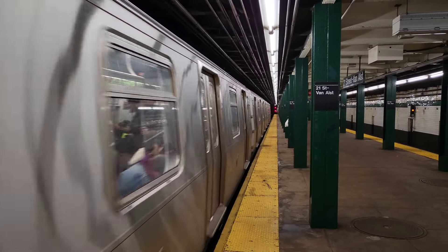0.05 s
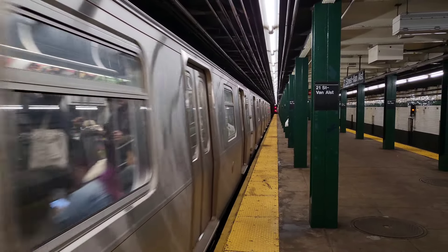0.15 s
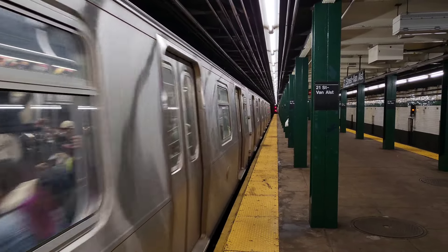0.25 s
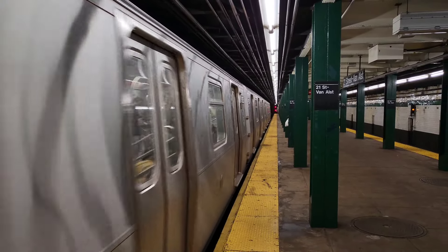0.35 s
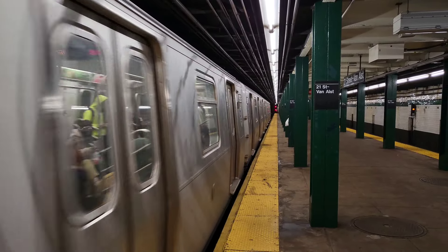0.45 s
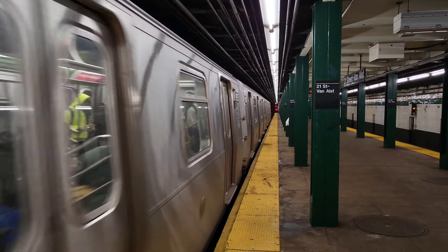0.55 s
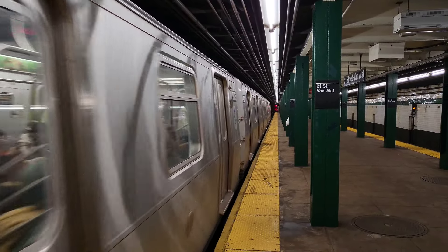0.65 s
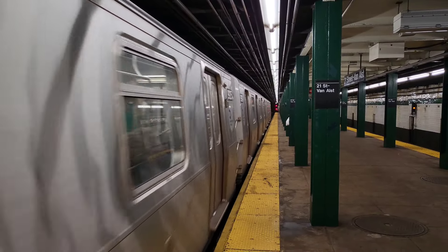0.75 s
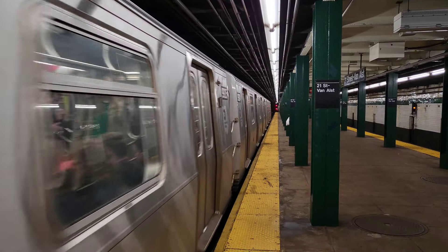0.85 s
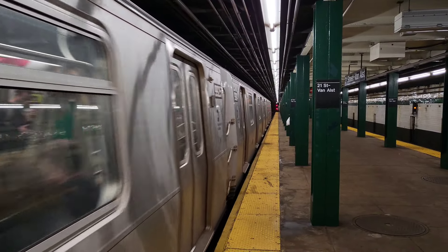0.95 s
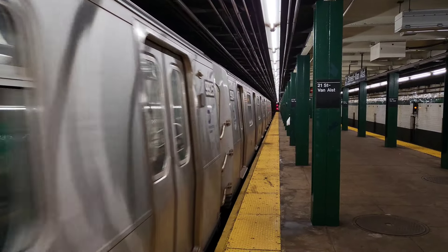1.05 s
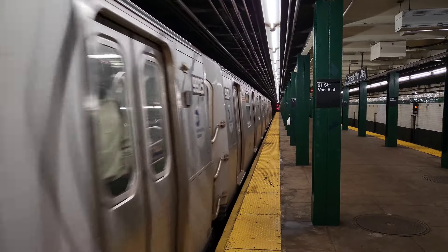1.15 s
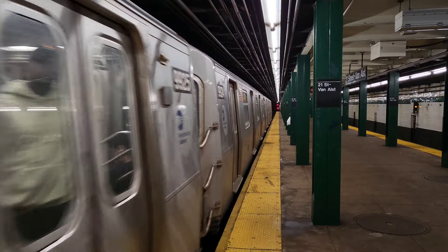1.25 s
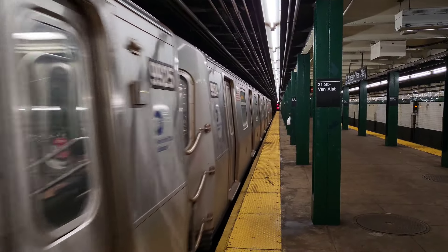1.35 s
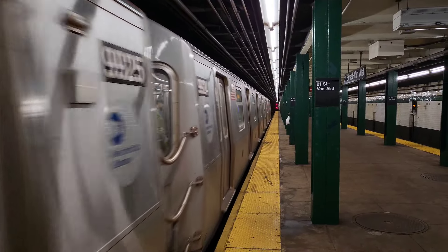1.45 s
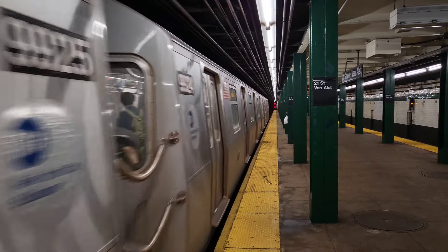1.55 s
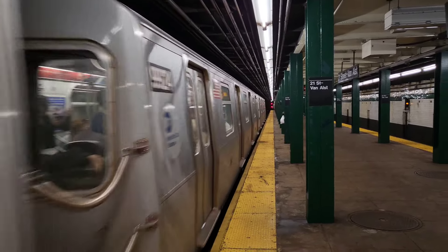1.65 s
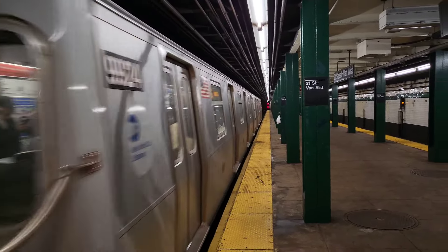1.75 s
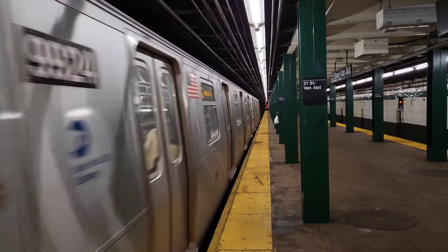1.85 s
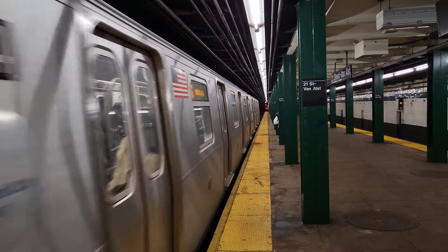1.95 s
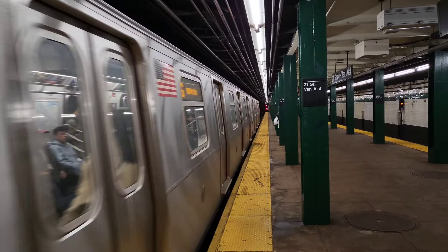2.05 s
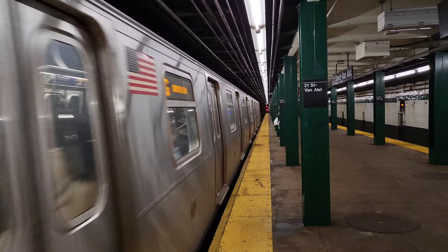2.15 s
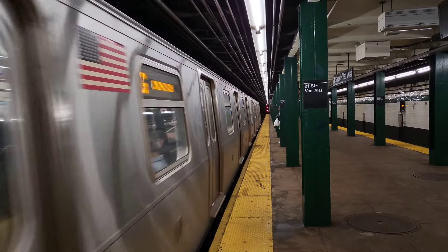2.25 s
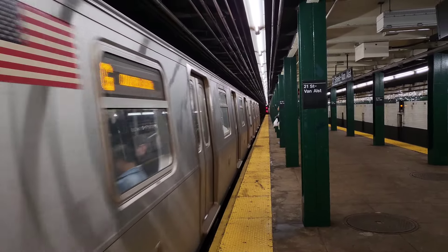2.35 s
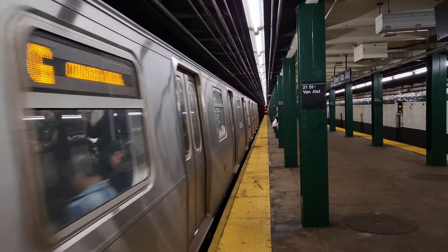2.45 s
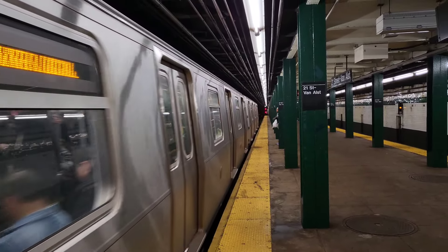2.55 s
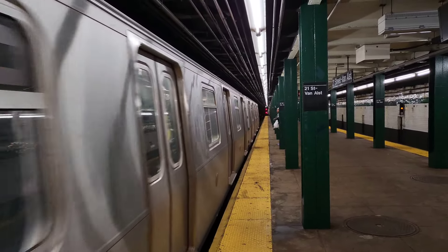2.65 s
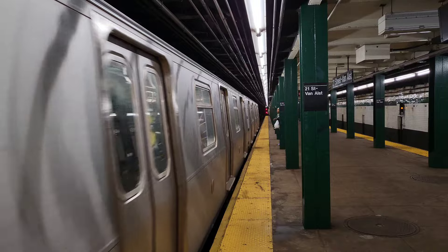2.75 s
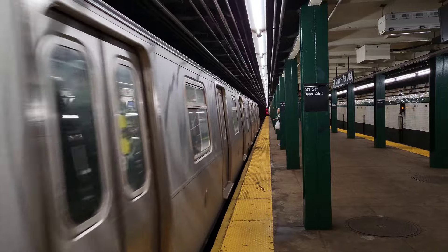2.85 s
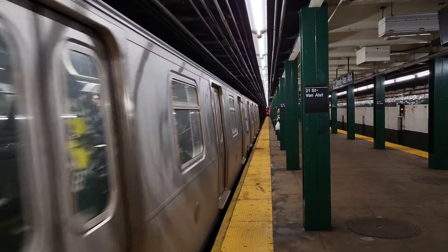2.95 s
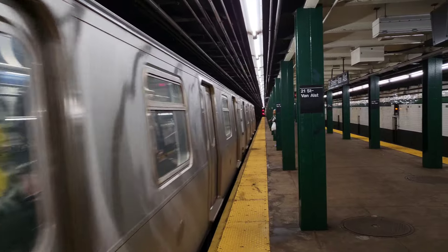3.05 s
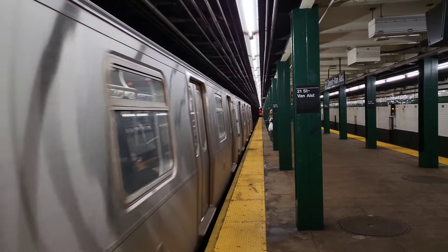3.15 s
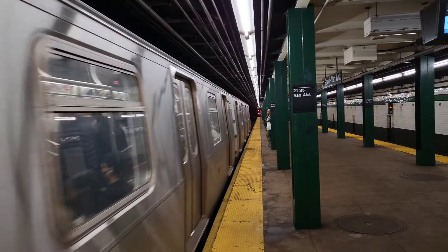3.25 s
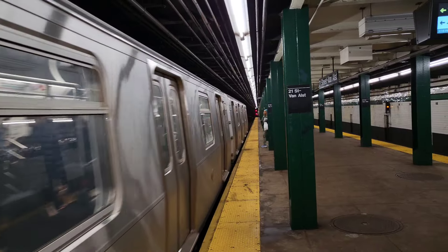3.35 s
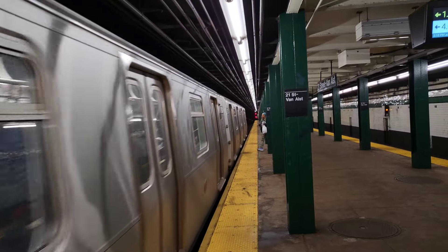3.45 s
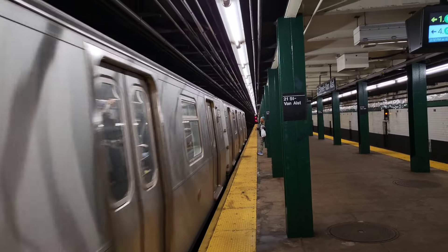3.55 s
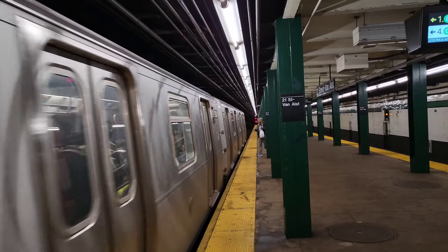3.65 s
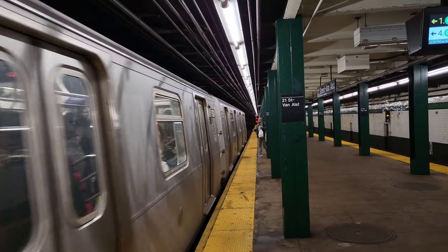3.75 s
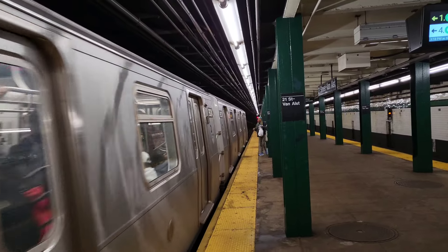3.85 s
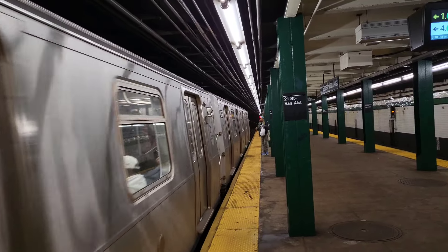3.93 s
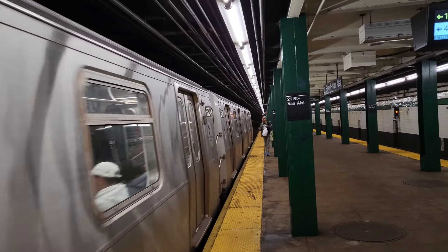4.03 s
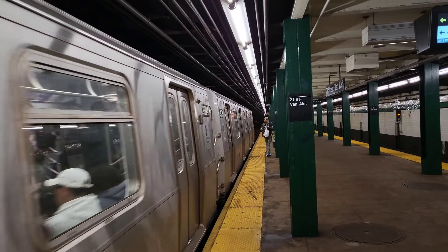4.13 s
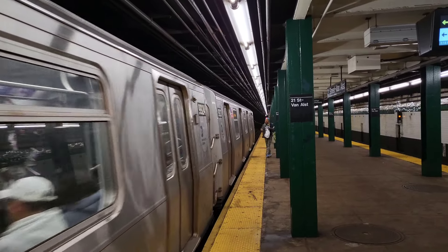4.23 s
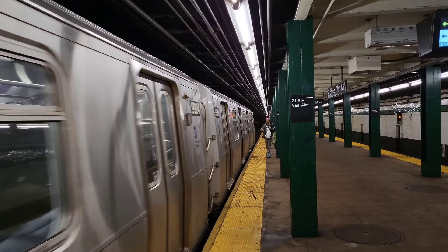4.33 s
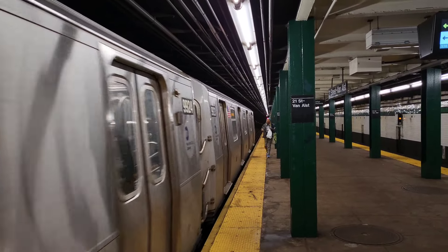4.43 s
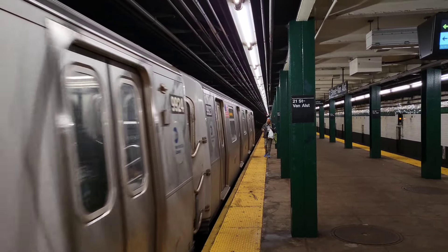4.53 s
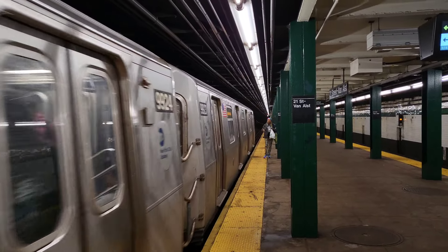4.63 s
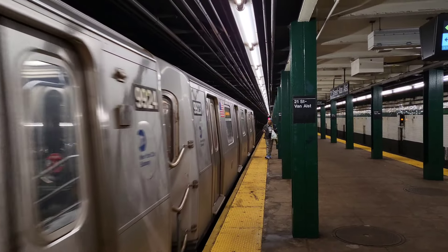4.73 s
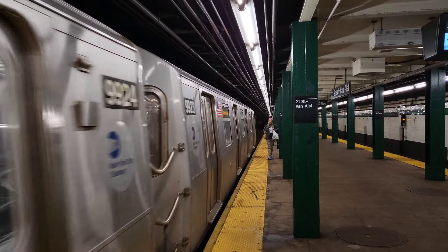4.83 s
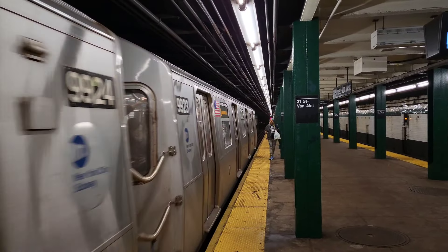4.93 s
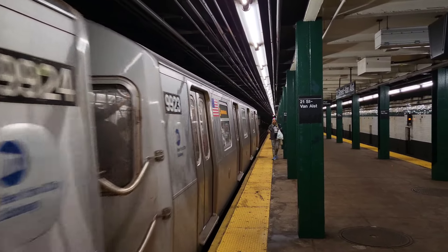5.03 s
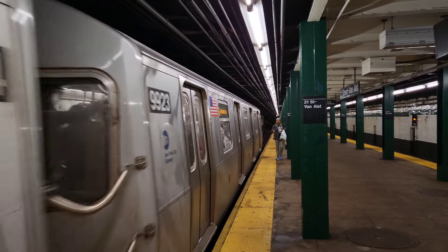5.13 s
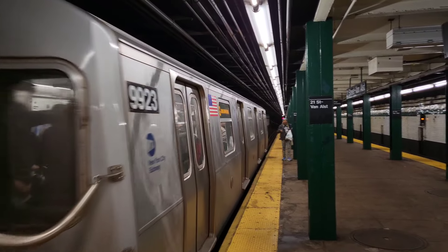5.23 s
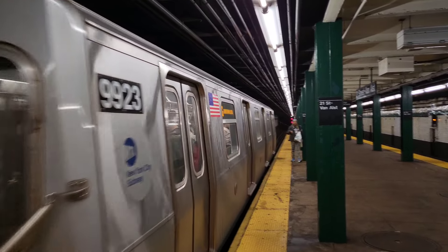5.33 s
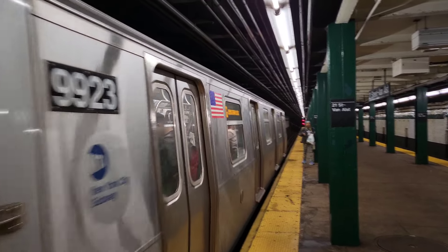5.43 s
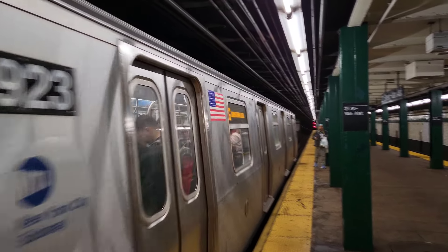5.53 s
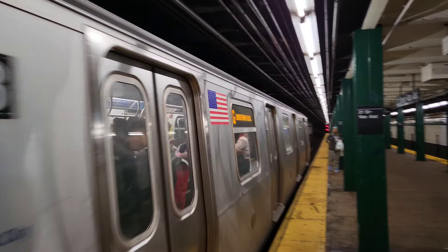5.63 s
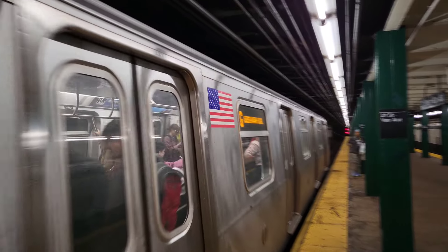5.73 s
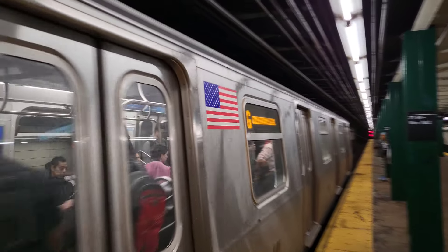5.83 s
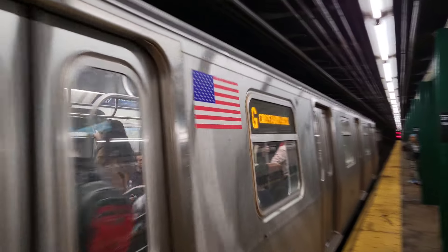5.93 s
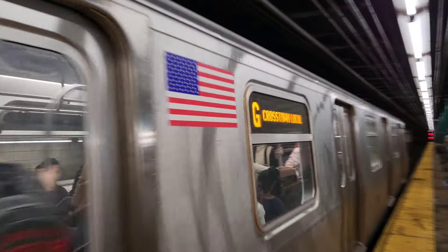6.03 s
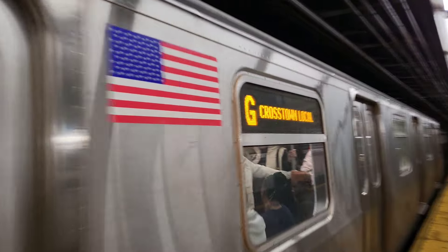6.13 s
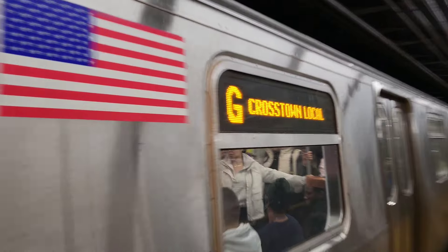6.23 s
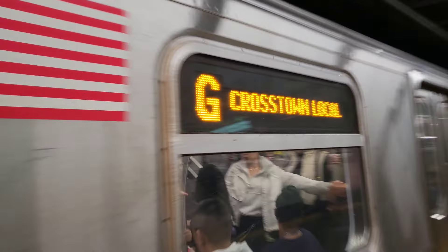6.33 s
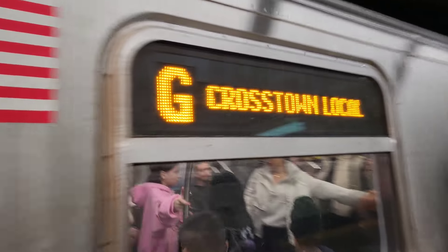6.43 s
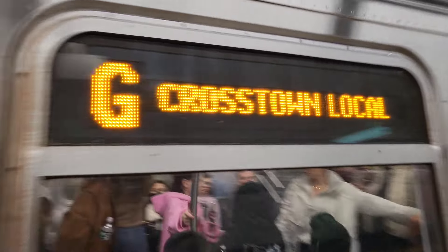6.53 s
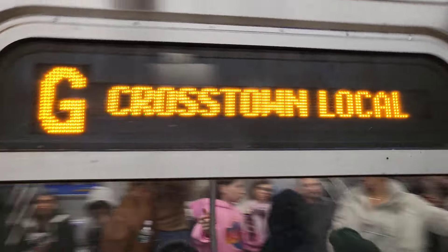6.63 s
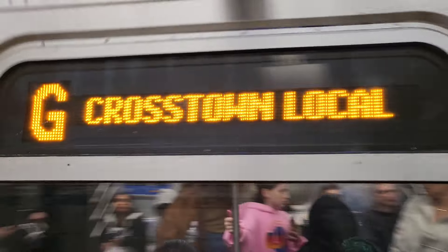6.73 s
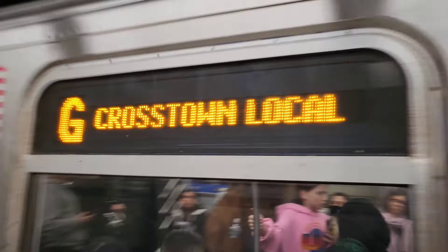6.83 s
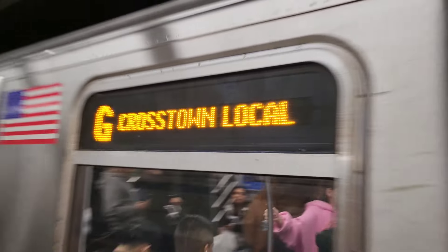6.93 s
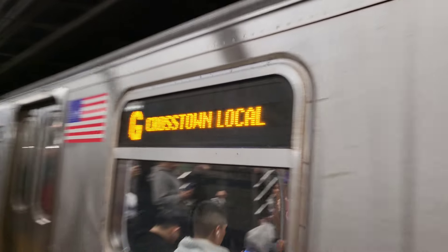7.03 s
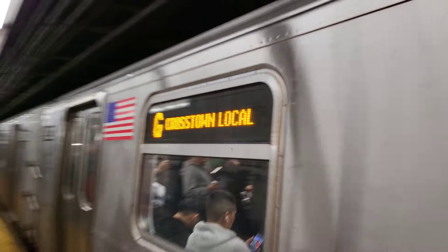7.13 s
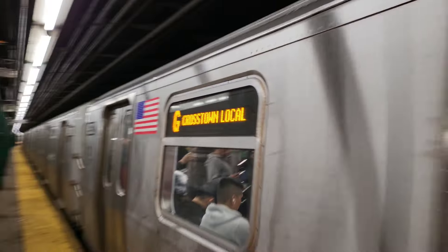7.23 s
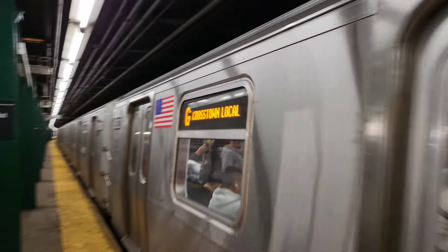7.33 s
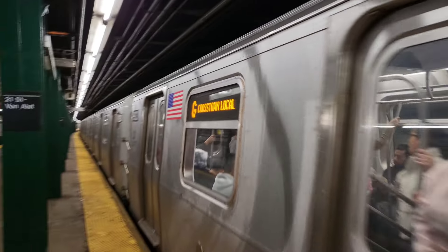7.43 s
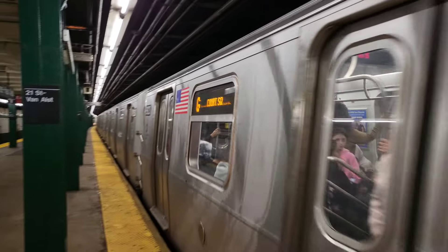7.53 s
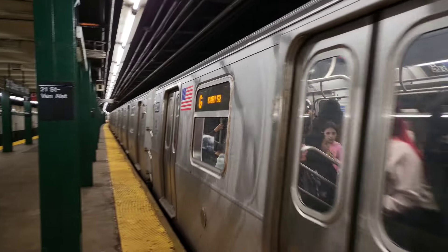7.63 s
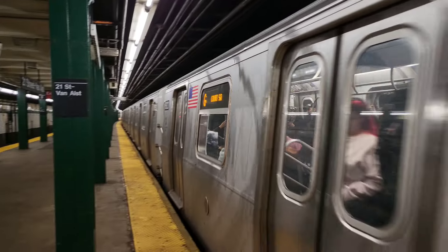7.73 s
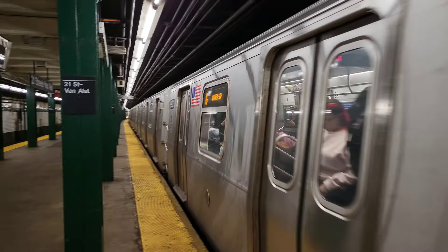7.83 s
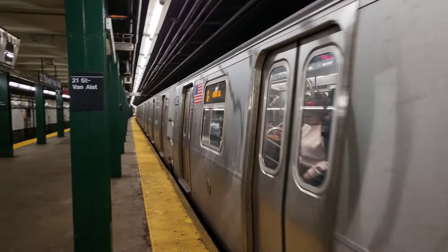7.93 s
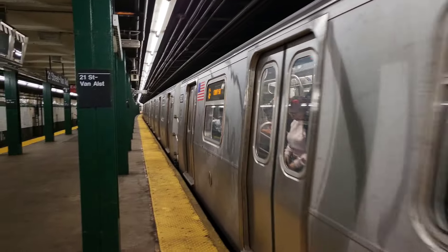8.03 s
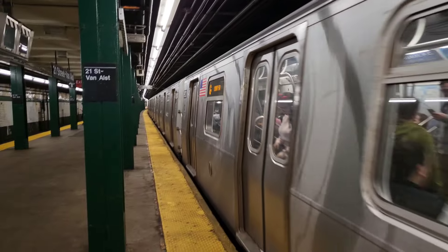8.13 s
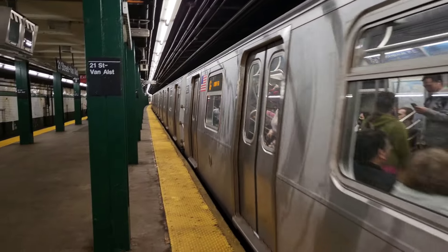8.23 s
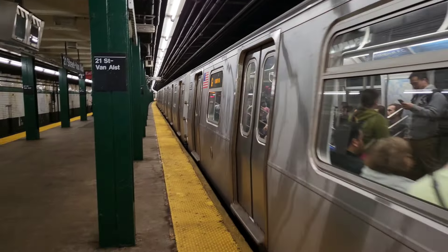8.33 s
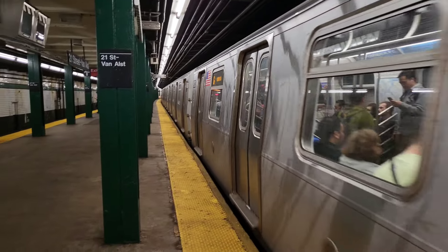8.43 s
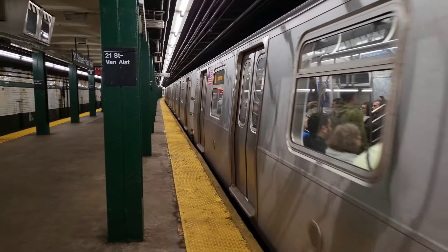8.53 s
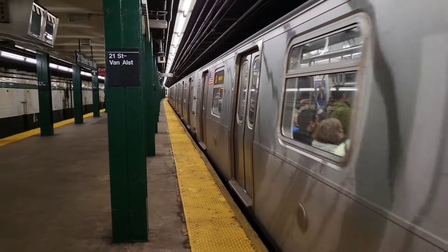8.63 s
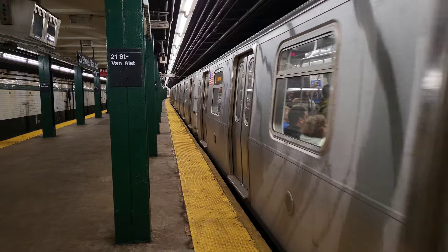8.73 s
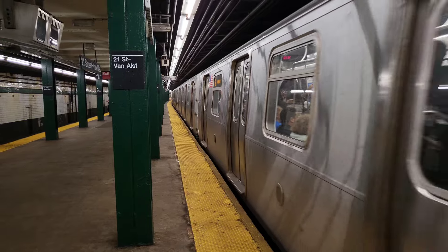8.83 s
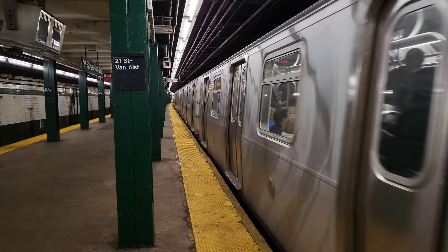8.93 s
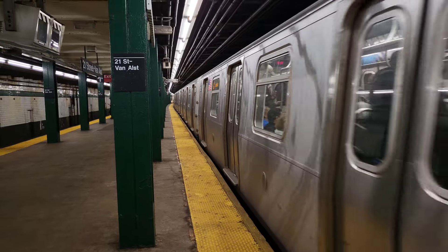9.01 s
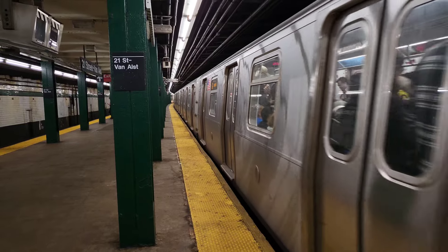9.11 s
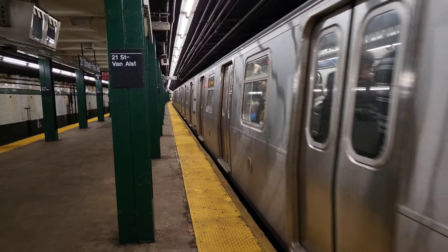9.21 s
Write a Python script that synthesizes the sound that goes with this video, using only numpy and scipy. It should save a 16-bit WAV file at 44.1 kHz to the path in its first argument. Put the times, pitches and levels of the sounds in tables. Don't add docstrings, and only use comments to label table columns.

```python
import sys
import numpy as np
from scipy import signal
from scipy.fft import rfft, irfft, next_fast_len
from scipy.io import wavfile

SR = 44100
rng = np.random.default_rng(int(sys.argv[2]) if len(sys.argv) > 2 else 0)


def invert_db(x):
    u = np.asarray(x, float) / 20
    return 10 ** u


def master_out(mix):
    frames = np.transpose(np.atleast_2d(mix))
    ceiling = np.clip(frames, -1, 1)
    pcm = np.round(ceiling * 32767).astype(np.int16)
    wavfile.write(sys.argv[1], SR, pcm)


N = 408807
STEP = 16


def rms_one(x):
    return x / np.sqrt(np.mean(np.abs(x) ** 2) + 1e-20)


def in_time(rows, t):
    s, *columns = np.transpose(rows)
    return np.array([np.interp(t, s, column) for column in columns])


def at_hz(points, hz):
    point_hz, value = np.transpose(points)
    return np.interp(np.log(hz), np.log(point_hz), value)


def bump(t, s, before_s, after_s):
    return np.exp(-((t - s) / np.where(t < s, before_s, after_s)) ** 2)


def slow_noise(hz, size):
    sos = signal.butter(2, np.clip(hz, .1, 600), fs=SR / STEP, output="sos")
    run_in = 1500
    return rms_one(signal.sosfilt(sos, rng.standard_normal(size + run_in))[run_in:])


def spread(width_hz, size):
    return slow_noise(width_hz / 2, size) + 1j * slow_noise(width_hz / 2, size)


def add(out, envelope, hz):
    slow = envelope.shape[1]
    bins = round(hz * slow * STEP / SR) + np.fft.fftfreq(slow, 1 / slow).astype(int)
    out[:, bins[bins > 0]] += np.fft.fft(envelope)[:, bins > 0] * STEP / 2


# time_s, rise_db, approach_s,
# leave_s
BOGIES = [
    (-0.05, 0, .3, .45),
    (1.92, 4, 0.17, 0.54),
    (2.72, 2, .08, 0.073),
    (4.65, 2.5, 0.24, 0.2),
    (5.5, 5.5, 0.46, 0.5),
    (6.45, 2, .1, .1),
    (9.1, 4.5, 0.19, 0.54),
]


def nearness(t):
    return sum(db * bump(t, s, approach_s, leave_s) for s, db, approach_s, leave_s in BOGIES)


# time_s, motor_current_hz
MOTOR = [
    (0, 66.32),
    (3, 57.93),
    (5.4, 47.62),
    (9.27, 32.2),
]


def motion(t, law):
    turn_s, turn_length_s = 5.87, 0.36
    halvings = np.log2(MOTOR[0][1] / in_time(MOTOR, t)[0])
    turned = np.clip((t - turn_s) / turn_length_s + .5, 0, 1)
    moves_db = np.array(law) @ [halvings, nearness(t), turned]
    return moves_db - moves_db.mean(1, keepdims=True)


# frequency_hz, likeness (-1 to 1)
LIKENESS = [(60, 0.91), (110, 0.99), (200, 0.94), (380, 0.8), (700, 0.38), (1290, -0.33), (2380, 0.027),
            (4400, 0.018), (8120, -0.033), (15000, -0.067)]


def two_ports(hz, mid, side):
    alike = np.clip(at_hz(LIKENESS, hz), -1, 1)
    return np.sqrt(1 + alike) * mid + np.sqrt(1 - alike) * side * [[1], [-1]]


def banded_noise(spectrum, centres_hz, moves_db, low_hz, high_hz, patchy_db, shared_db, order, size):
    slow = moves_db.shape[1]
    length = slow * STEP // size
    hz = np.maximum(np.arange(length // 2 + 1) * SR / size / length, 1)
    mid, side = rfft(rng.standard_normal((2, length))) * invert_db(at_hz(spectrum, hz))
    pair = two_ports(hz, mid, side)
    rank = np.argsort(centres_hz)
    together = slow_noise(8.6, slow)
    out = 0
    for centre in low_hz * 2 ** np.arange(0, np.log2(high_hz / low_hz), 1 / order):
        window = np.clip(1 - order * np.abs(np.log2(hz / centre)), 0, 1)
        shares = [np.interp(np.log(centre), np.log(np.sort(centres_hz)), rank == k) for k in range(len(rank))]
        gain_db = shares @ moves_db + shared_db * together + patchy_db * slow_noise(23.0, slow)
        gain = np.interp(np.arange(length) * size / STEP, np.arange(slow), invert_db(gain_db))
        out = out + gain * irfft(pair * window, length)
    return rms_one(irfft(rfft(out), slow * STEP)[:, :N])


ROLL_HZ = [180, 55, 420, 950]
# frequency_hz, level_db (per Hz)
RUMBLE = [(12, -45), (25, -20), (40, -7.5), (58, -5.5), (100, -12), (125, 2), (190, -0.5), (265, -4.5),
          (380, -5), (530, -10), (800, -16), (1100, -21.5), (1900, -27.5), (2700, -32)]
# level_db per halving of speed, share of bogie nearness, level_db after the turn
ROLL_LAW = [
    (-1.5, 0.04, -2.5),
    (-0.5, .05, .5),
    (-10, 0.14, 0),
    (-7, 0.35, 0),
]
# time_s, swell_db, centre_hz, reach_octaves
JOLTS = [(0.33, 3.5, 200, 1), (0.74, 4, 250, 1.5), (0.86, 3.5, 300, 1.2), (1.18, 5.5, 950, 1),
         (1.26, 7, 180, 0.67), (1.63, 4, 350, 3.4), (1.89, 2, 950, 1.1), (2.08, 4, 400, 1.7),
         (2.33, 4.5, 180, 0.92), (2.56, 7, 200, 2.4), (3.05, 5.5, 400, 3.3), (3.55, 4.5, 120, 1.8),
         (4.03, 3, 200, 1.1), (4.2, 2, 300, 1.5), (4.37, 3, 55, 0.85), (4.58, 7, 180, 0.53),
         (4.7, 2, 420, 1.1), (4.88, 5.5, 180, 0.73), (5.22, 3, 180, 1.9), (5.55, 2.5, 180, 0.92),
         (6.03, 9, 80, 0.77), (6.55, 2, 300, 0.83), (7.4, 4, 950, 1.3), (7.55, 5, 200, 1.9),
         (8.0, 6, 420, 1.2), (8.08, 6, 55, 1), (8.24, 5.5, 180, 0.67), (8.36, 4.5, 420, 1),
         (8.65, 8, 55, 1), (9.11, 0, 400, 2.3)]


def rolling(t):
    half_length_s = 0.068
    moves_db = motion(t, ROLL_LAW)
    for s, db, hz, octaves in JOLTS:
        reach = bump(np.log2(ROLL_HZ), np.log2(hz), octaves, octaves)
        moves_db = moves_db + db * np.outer(reach, bump(t, s, half_length_s, half_length_s))
    return invert_db(-21) * banded_noise(RUMBLE, ROLL_HZ, moves_db, 21.3, 2600,
                                   patchy_db=2.0, shared_db=0.4, order=3, size=4)


# pitch_hz, width_hz, level_db
BODY = [(160.3, 40, -38), (228.6, 12, -35.5), (261.6, 10.3, -32), (369.2, 34, -34.5), (471, 55, -37.5),
        (520, 32, -48), (655, 44, -45), (800, 67, -51.5), (900, 28, -50), (1027, 20, -63), (1180, 66, -56),
        (1518, 62, -52)]


def body(t, swell_db=4.5, fall_db=-1.21):
    slow = len(t)
    out = np.zeros((2, slow * STEP // 2 + 1), complex)
    for hz, width_hz, db in BODY:
        gain = invert_db(db + fall_db * (t - 2) + swell_db * slow_noise(1.4, slow))
        pair = two_ports(hz, spread(width_hz, slow), spread(width_hz, slow))
        add(out, gain * pair / np.sqrt(2), hz)
    return irfft(out, slow * STEP)[:, :N]


AIR_HZ = [3300, 6800, 9500, 13400]
# frequency_hz, level_db (per Hz)
HISS = [(1500, -27), (2200, -5), (3300, -6.5), (4600, -5.5), (5600, -13.5), (6100, -16.5), (6600, -15.5),
        (7500, -16), (8200, -17.5), (9000, -19), (12000, -22.5), (13500, -25.5), (14300, -28), (15800, -24)]
# level_db per halving of speed, share of bogie nearness, level_db after the turn
AIR_LAW = [
    (-10, 1, 1),
    (-2.5, 0.96, 1),
    (-7.5, 1, 4),
    (.5, 0.77, 0.5),
]


def air(t):
    return invert_db(-43.5) * banded_noise(HISS, AIR_HZ, motion(t, AIR_LAW), 1320, 19000,
                                     patchy_db=.8, shared_db=.1, order=2, size=1)


# start_s, peak_db, pitch_hz
JOINTS = [(2.04, -2, 142), (2.099, -3, 275), (2.33, -7, 131), (2.531, 3, 388), (2.581, -7, 128),
          (3.008, -0.5, 323), (3.073, -16, 157), (4.565, -24, 184), (5.207, -0.5, 165), (5.55, 0, 132),
          (5.59, 0, 174), (5.894, -10, 147)]


def joints(cycles=9.6):
    out = np.zeros(N)
    age = np.arange(SR // 8) / SR
    onset = 1 - np.exp(-age / 0.0066)
    for s, db, hz in JOINTS:
        at = round(s * SR)
        decay = np.exp(-age * hz / cycles * 3)
        out[at:at + len(age)] += invert_db(db - 7.5) * np.sin(2 * np.pi * hz * age) * decay * onset
    out[:len(age)] -= invert_db(-6.0) * np.cos(2 * np.pi * 170 * age) * np.exp(-age / 0.0032)
    return out


# start_s, peak_db, pitch_hz
SQUEAK = [
    (2.6279, -41, 13800),
]


def squeak(length_s=.012):
    out = np.zeros(N)
    for s, db, hz in SQUEAK:
        age = np.clip(np.arange(N) / SR - s, 0, 1)
        decay = np.exp(-age * np.log(1000) / length_s / 2)
        out += invert_db(db) * np.sin(2 * np.pi * hz * age) * decay * (1 - np.exp(-age / .001))
    return out * invert_db(np.array([[3], [-4]]))


TONES = [(1, -2, 1), (2, -1, 0), (2, 0, 0), (2, 1, 0), (2, 4, 0), (2, -12, 0), (2, 12, 0), (3, 0, 1),
         (3, 12, 1), (4, 0, 1), (4, 12, 1), (5, 0, 1), (6, -12, 2), (6, 0, 2), (7, 0, 2), (8, 0, 3),
         (10, 0, 2), (11, 0, 1), (12, 0, 1)]
# level_db (against main), share of bogie nearness, slope_db_per_s
FIRST = [(0, -32), (0.3, -35), (0.72, -34.5), (1.0, -42), (1.9, -52)], [(-27.5, 0.37, 3), (-23, .1, 1),
         (-36, .3, -.5)]
SECOND = [(0.72, -50), (0.8, -35), (1.3, -31.5), (1.7, -26.5), (2.3, -30.5), (4.9, -31), (5.33, -33),
          (5.47, -39.5), (6.2, -57)], [(-30, 0.56, 0.16), (-22.5, 1, -2.2), (-42.5, .9, 1.5)]
THIRD = [(4.92, -62), (4.98, -41), (5.25, -39), (5.45, -36), (6.1, -36.5), (7.4, -37), (8.7, -38.5),
         (9.27, -36)], [(-14.5, 0.48, 0.08), (-35.5, 0.58, 3), (-20.5, 0.43, -3)]
# cars, rate_hz, width_hz of each tone, level_db of each tone against its column
STAGES = [
    (FIRST, 1238, [80, 90, 90, 91, 120, 80, 80, 330, 130, 320, 120, 250, 150, 260, 300, 400, 400, 400, 400], [7, -1.5, -6.5, -1, -21, -15, -17, 17.5, 1, 8.5, -2, 0, -26, 3.5, -10, 1, -15, -23, -15]),
    (SECOND, 1431, [80, 87, 79, 85, 130, 90, 110, 342, 150, 220, 180, 350, 300, 240, 300, 320, 450, 400, 400], [6, -5, 1, -6, -24, -23.5, -25, 8.5, -20, 5.5, -5, 0, -5.5, 4, -23, 1, -13, -30, -33]),
    (THIRD, 1284, [69.4, 67, 69, 65.5, 120, 79.6, 80, 200, 150, 170, 150, 240, 130, 170, 240, 230, 260, 350, 350], [-3.5, 0, -0.5, -2.5, -41, -16, -14, 4.5, -25, 3, -14, -9, -18, 7, -4, 3, -11.5, -20, -22]),
]
# time_s, level_db
FLARES = [(0.333, 7), (0.819, 0), (0.9, -1), (1.63, 2.5), (1.762, -7), (2.628, 11), (2.778, 1), (2.873, 8),
          (2.98, 8.5), (3.374, 6.5), (3.971, -0.5), (4.041, 6.5), (5.78, 6), (6.399, 2), (6.524, 7.5),
          (7.188, 2), (7.56, 4), (7.723, 5), (8.009, 12), (8.313, 2.9), (8.957, 5.5), (9.111, 6.5)]
# time_s, level_db
LULLS = [(0.42, -4), (0.65, -4), (1.48, -2), (2.38, -6), (3.45, -7.5), (4.53, -5), (6.47, -5), (7.45, -2),
         (7.6, -7), (8.05, -7), (8.19, -6), (8.58, -6)]


def whine(t, flutter_db=0.95, own_db=2.5):
    flare_s, lull_s = 0.013, 0.024
    slow = len(t)
    out = np.zeros((2, slow * STEP // 2 + 1), complex)
    motor_turns = np.cumsum(in_time(MOTOR, t)[0]) * STEP / SR
    flares_db = sum(db * bump(t, s, flare_s, flare_s) for s, db in FLARES)
    flares_db = flares_db + sum(db * bump(t, s, lull_s, lull_s) for s, db in LULLS)
    for (main, upper), rate_hz, widths_hz, tones_db in STAGES:
        cars_db = in_time(main, t)[0]
        upper_db = cars_db + np.array(upper) @ [np.ones(slow), nearness(t), t - main[0][0]]
        levels_db = np.vstack([cars_db + flares_db, upper_db])
        silent_s = np.maximum(main[0][0] - .04 - t, t - main[-1][0] - .04)
        levels_db = levels_db - 1000 * np.clip(silent_s, 0, .1) + flutter_db * slow_noise(9.6, slow)
        for (multiple, side, column), width_hz, db in zip(TONES, widths_hz, tones_db):
            gain = invert_db(levels_db[column] + db + own_db * slow_noise(39, slow))
            dither = np.array([spread(width_hz, slow) for ear in "LR"])
            side_shift = np.exp(2j * np.pi * side * motor_turns)
            add(out, gain * dither * side_shift, multiple * rate_hz)
    return irfft(out, slow * STEP)[:, :N]


def scene():
    t = np.arange(2 * next_fast_len(N // STEP // 2 + 200)) * STEP / SR
    train = rolling(t) + body(t) + joints() + air(t) + whine(t) + squeak()
    return train * invert_db(np.array([[-.1], [.1]]))


def low_pass(x):
    return signal.sosfilt(signal.butter(12, 15770, fs=SR, output="sos"), x)


def record(dry):
    return low_pass(dry)


dry = scene()
out = record(dry)
master_out(out)
```